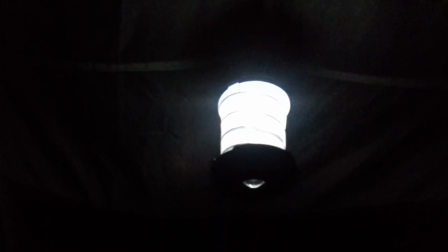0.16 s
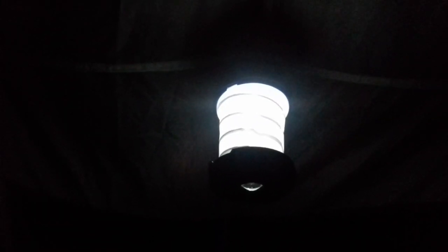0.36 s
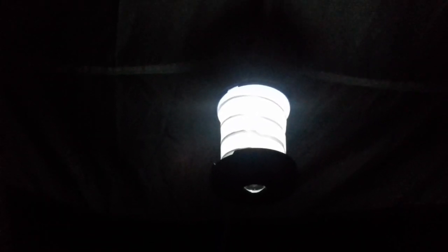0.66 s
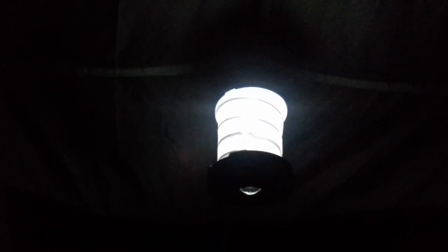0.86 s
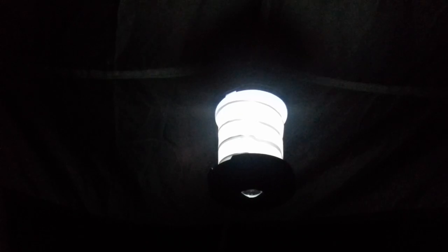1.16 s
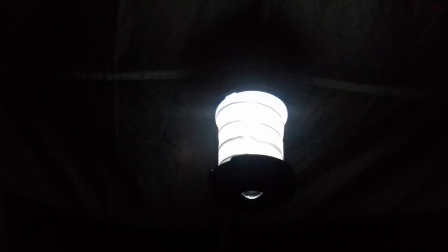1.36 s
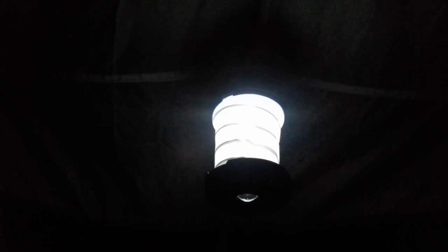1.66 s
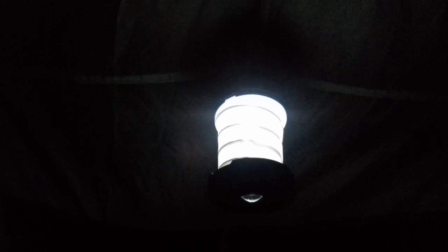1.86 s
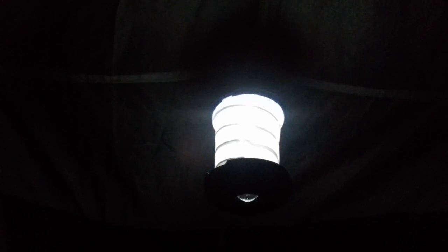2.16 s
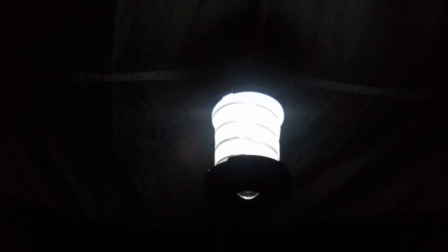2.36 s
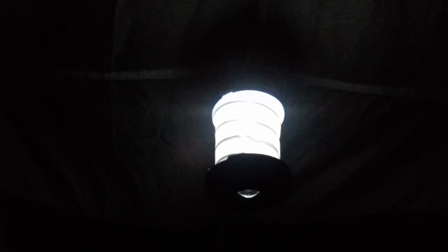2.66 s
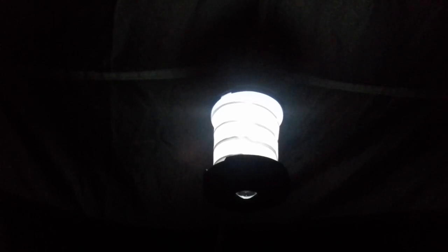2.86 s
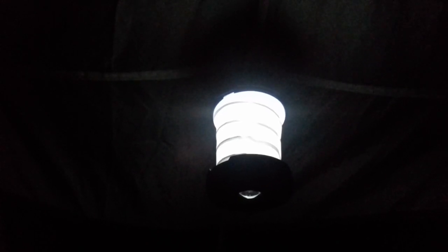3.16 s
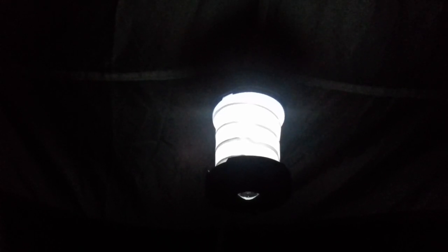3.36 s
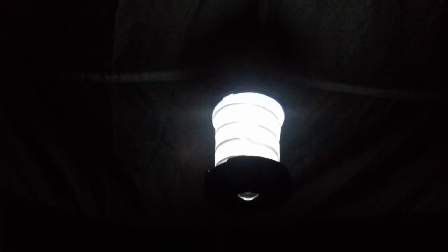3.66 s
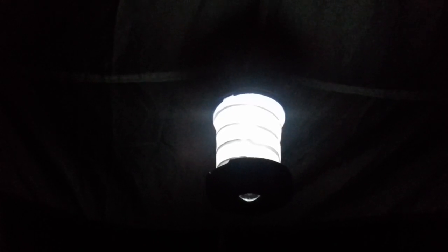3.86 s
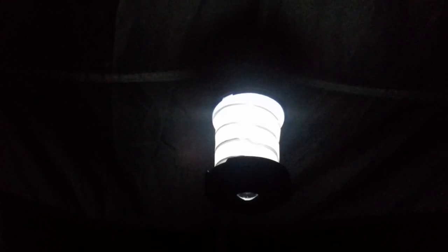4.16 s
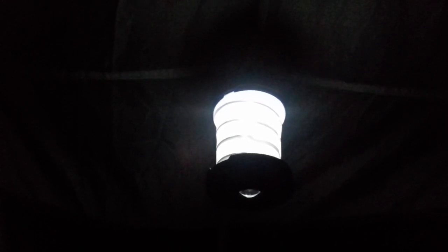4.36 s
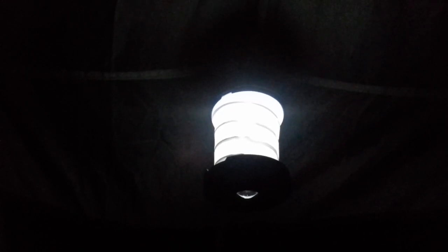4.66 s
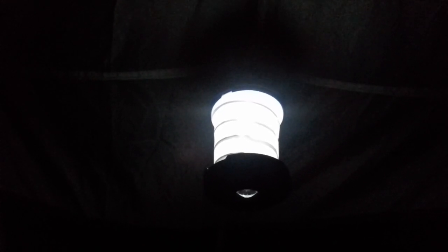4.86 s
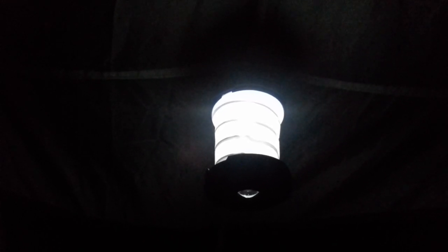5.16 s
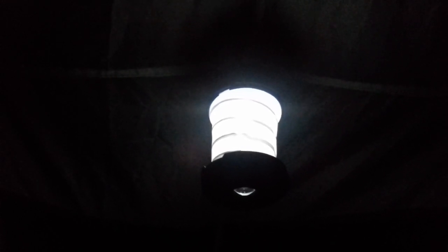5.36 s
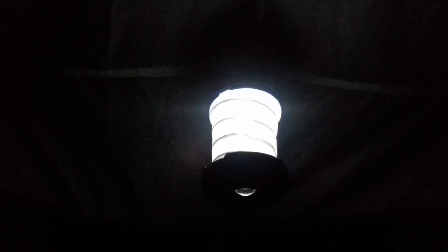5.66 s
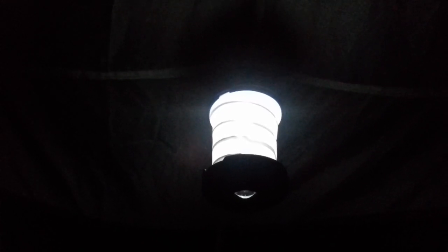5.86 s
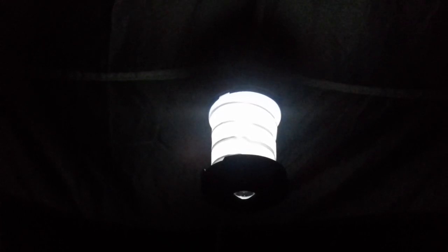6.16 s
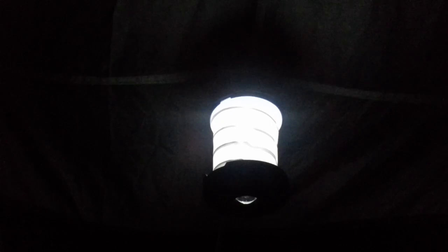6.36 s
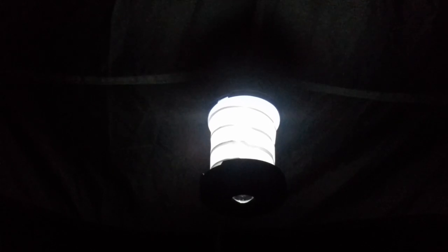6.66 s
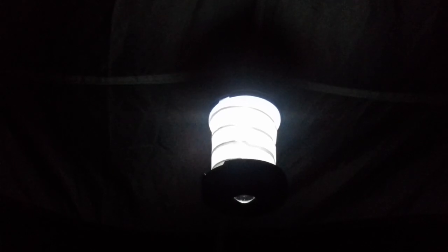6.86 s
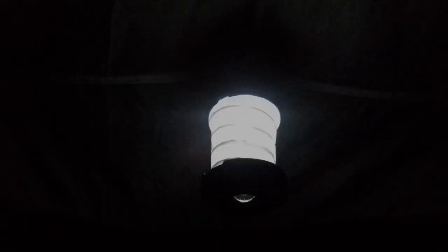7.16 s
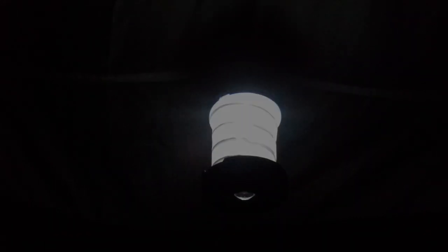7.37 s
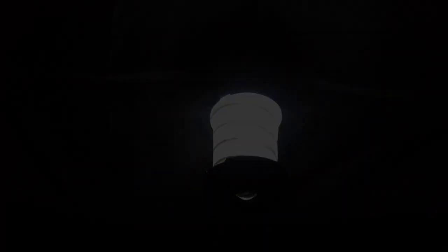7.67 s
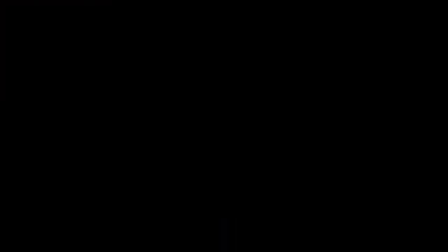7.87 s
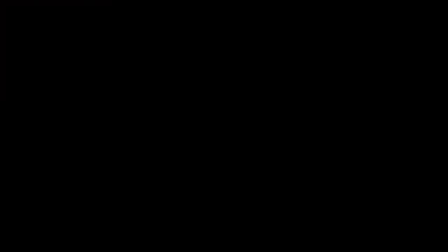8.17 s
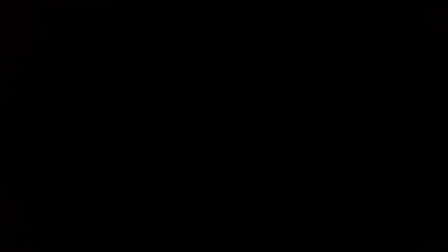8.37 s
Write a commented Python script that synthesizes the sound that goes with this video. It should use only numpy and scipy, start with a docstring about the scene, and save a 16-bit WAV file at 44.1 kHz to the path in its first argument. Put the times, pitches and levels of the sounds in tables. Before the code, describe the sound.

Inside a small tent with a lit lantern, steady rain falls on the fabric roof. Fat drops land irregularly as sharp, dry taps over a dense, finer patter, with tiny bright spray ticks and a soft low boom of the canopy. The microphone is close under the roof, with a very short weak echo and faint hiss. Near the end the sound dips for an instant, then the rain resumes.

```python
"""Steady rain on a tent, heard from inside, close under the roof, with a faint, slowly fading hiss.
From the start fat drops stand out of a dense patter: each is one sharp push on taut fabric, which
rings and flutters for a few milliseconds. Bright noise bursts make the spray, random pushes the
soft boom of the canopy, and decaying noise the short echo from ground and walls.
Near the end, at 7.9 s, the level dips at once and recovers within a fraction of a second."""
import sys
import numpy as np
from scipy import signal
from scipy.fft import rfft, irfft
from scipy.io import wavfile
from scipy.ndimage import uniform_filter1d

SR = 44100
rng = np.random.default_rng(int(sys.argv[2]) if len(sys.argv) > 2 else 0)


def dump_mix(stems):
    """Bounce the given channels to the path in sys.argv[1] as a 16-bit WAV at rate SR."""
    frames = np.atleast_2d(stems).T  # one column per channel
    limited = np.clip(frames, -1, 1)  # hard clip at full scale
    pcm = np.round(limited * 32767).astype(np.int16)
    wavfile.write(sys.argv[1], SR, pcm)


N = 375291
TIME = np.arange(N) / SR
DROP_SAMPLES = 1024
DROP_LEVEL_S = 0.01  # span over which a drop's rms level is defined


# The fattest drops overhead. Each row: start in seconds, tap level over 10 ms in dB, ring of the fabric
# at that spot in Hz, its bass roll-off in Hz, flutter against the push in dB.
FAT_DROPS = [(0.0099, -26.0, 1730, 3000, -1), (0.047, -30, 1510, 1500, 0), (0.1226, -25, 1090, 100, -9),
             (0.1487, -27, 750, 300, -4), (0.19, -27, 3160, 100, -13), (0.227, -25.5, 1720, 100, 5),
             (0.2321, -29, 540, 1500, 0), (0.2891, -23, 3460, 100, 13), (0.3068, -31.0, 1140, 100, 5),
             (0.355, -26, 1810, 100, -21), (0.3753, -29.5, 1990, 100, -5), (0.4253, -35, 1370, 3000, -2),
             (0.4337, -26, 1090, 300, -13), (0.4985, -27.5, 980, 300, 12), (0.5077, -23.0, 750, 1500, -13),
             (0.574, -31, 990, 100, 2), (0.6056, -27.5, 1040, 3000, 4), (0.615, -36, 1730, 300, -10),
             (0.6185, -18, 3080, 100, 3), (0.6223, -39, 2750, 100, 5), (0.6794, -27.5, 3360, 100, -11),
             (0.7037, -30.0, 1250, 100, -15), (0.7579, -27.5, 1900, 100, 3), (0.7861, -27, 2620, 100, 4),
             (0.8022, -32.5, 3460, 3000, -16), (0.83, -21.5, 2730, 3000, 3), (0.8541, -30, 1090, 700, -14),
             (0.8796, -28.5, 1650, 3000, 9), (0.9284, -28, 600, 3000, 5), (0.9434, -28.5, 790, 100, -9),
             (0.9876, -28.5, 520, 700, -3), (1.014, -30, 2080, 100, -5), (1.0317, -26.0, 2170, 100, 6),
             (1.079, -28, 1220, 1500, -11), (1.187, -27, 950, 300, -6), (1.2035, -30.0, 990, 3000, -7),
             (1.2142, -27, 520, 1500, -2), (1.2809, -29.5, 865, 300, -6), (1.2932, -30, 1650, 300, 6),
             (1.3549, -33, 2880, 700, 5), (1.3643, -29.5, 570, 3000, -12), (1.3946, -27.5, 2510, 100, -4),
             (1.5043, -28, 1040, 3000, -10), (1.551, -28.5, 520, 1500, 1), (1.6031, -27, 1140, 100, 0),
             (1.6285, -34, 3160, 1500, -18), (1.6712, -34, 2080, 100, -7), (1.686, -26, 2000, 3000, -10),
             (1.71, -28.5, 2390, 100, 4), (1.731, -27.5, 2740, 3000, -6), (1.784, -31.5, 1820, 100, 5),
             (1.8281, -28, 3160, 3000, 0), (1.9177, -28, 1370, 700, 0), (1.9246, -30, 1310, 300, -10),
             (1.9586, -26.5, 800, 700, 3), (1.97, -28.5, 2280, 1500, -13), (2.0468, -25, 1510, 100, -2),
             (2.0568, -23, 1810, 100, -1), (2.1177, -29, 1580, 1500, -17), (2.1228, -29, 570, 300, 1),
             (2.273, -27.5, 3020, 1500, 3), (2.291, -29.5, 860, 700, 2), (2.3008, -23, 3630, 300, -13),
             (2.328, -26.5, 3160, 100, -1), (2.3533, -29.5, 725, 300, -7), (2.416, -30, 1810, 100, -18),
             (2.4595, -21.5, 1810, 100, 2), (2.4637, -35, 520, 1500, 9), (2.4883, -28, 2870, 700, -3),
             (2.5086, -30.0, 630, 1500, -11), (2.5959, -25, 2880, 100, -13), (2.6279, -26, 1440, 3000, -5),
             (2.7178, -26.5, 3300, 300, 0), (2.725, -29, 1990, 100, -15), (2.7276, -28, 3160, 100, 9),
             (2.7564, -26.5, 1330, 300, -18), (2.8048, -29, 860, 3000, 10), (2.8642, -27.5, 2510, 100, 2),
             (2.8822, -28, 2070, 300, -14), (2.9038, -23, 520, 3000, -9), (2.9107, -24.5, 1370, 700, 0),
             (2.9264, -18.5, 2730, 300, -10), (2.985, -27.5, 790, 700, 5), (3.0029, -18, 1500, 100, 12),
             (3.0237, -24.5, 750, 1500, -10), (3.0268, -17.0, 2420, 700, -8), (3.0428, -31, 2080, 100, -13),
             (3.0573, -26.5, 1730, 100, -10), (3.097, -29.5, 520, 700, -18), (3.1805, -26.5, 2880, 700, -3),
             (3.1908, -29, 790, 700, -10), (3.2015, -23, 2180, 100, 15), (3.2217, -30, 2510, 300, 10),
             (3.2357, -29, 2280, 300, 3), (3.2436, -28, 3800, 3000, -4), (3.2736, -24.5, 3650, 3000, -15),
             (3.336, -26, 2220, 100, -11), (3.3444, -27, 790, 1500, -2), (3.4073, -24.5, 2080, 100, -13),
             (3.4296, -25.5, 800, 300, 1), (3.465, -24.0, 1810, 100, -1), (3.4972, -26.5, 520, 1500, -8),
             (3.515, -28.5, 570, 300, 0), (3.5418, -27.5, 3800, 100, 3), (3.5536, -31.5, 3630, 100, -18),
             (3.6322, -27.5, 520, 1500, 1), (3.6507, -29.5, 790, 1500, 4), (3.7796, -30, 1370, 3000, 5),
             (3.7837, -27, 1740, 1500, 3), (3.817, -35, 2620, 1500, -5), (3.8334, -24.5, 760, 1500, -4),
             (3.8871, -28.5, 1810, 3000, -3), (3.9197, -26.5, 660, 700, 12), (3.9458, -29, 755, 700, 9),
             (3.961, -26, 2900, 300, 20), (4.0278, -29.0, 1810, 300, 0), (4.053, -27, 1490, 100, 8),
             (4.1038, -25.5, 3100, 100, -17), (4.1224, -27.5, 1900, 100, -9), (4.187, -30.5, 2080, 100, -8),
             (4.2742, -23.5, 1370, 100, -2), (4.283, -29, 1050, 700, -6), (4.3035, -25.0, 2080, 300, -3),
             (4.3102, -26.5, 1040, 3000, 0), (4.3438, -28.5, 750, 700, 8), (4.3487, -31, 520, 3000, -1),
             (4.3544, -23.5, 790, 3000, 1), (4.3631, -29.5, 3160, 1500, -11),
             (4.4226, -24.5, 3020, 700, -11), (4.4669, -28.5, 3160, 300, 4), (4.549, -27.5, 3000, 100, -3),
             (4.6058, -30.5, 1810, 700, -17), (4.6302, -28, 520, 700, 17), (4.7094, -23.5, 790, 700, -8),
             (4.7609, -25, 2080, 100, 5), (4.7816, -23.5, 520, 3000, -8), (4.859, -31, 860, 3000, 3),
             (4.8766, -29.5, 790, 100, 0), (4.8796, -27.5, 520, 1500, -2), (4.8993, -29.5, 3460, 300, -16),
             (4.9612, -26, 865, 1500, -5), (4.9915, -23.5, 1900, 700, -8), (4.9992, -32, 2180, 100, 5),
             (5.0106, -28.5, 800, 3000, -6), (5.0468, -29.5, 1250, 3000, 0), (5.113, -27, 1730, 100, -1),
             (5.1183, -27, 1250, 100, -24), (5.133, -29.5, 1810, 100, 5), (5.14, -31, 2080, 3000, -6),
             (5.1775, -30, 1650, 1500, 9), (5.2425, -28.5, 1730, 700, -21), (5.307, -28, 1730, 100, 9),
             (5.4143, -28.5, 750, 100, 9), (5.4839, -26.5, 2620, 300, -16), (5.4884, -24, 2000, 100, 5),
             (5.4936, -29, 1440, 100, 10), (5.5072, -28, 1200, 1500, -7), (5.5622, -27.0, 514, 700, 13),
             (5.583, -24, 2180, 100, 4), (5.6354, -33, 1510, 3000, 5), (5.6595, -26, 1510, 100, 1),
             (5.6747, -28.5, 3440, 1500, -18), (5.6803, -31, 2080, 3000, -2),
             (5.7216, -28.5, 1370, 700, -13), (5.8335, -33, 2750, 3000, -5), (5.854, -29, 3460, 100, -8),
             (5.9396, -30.5, 990, 300, -4), (6.014, -31, 1900, 300, -4), (6.0358, -29, 3310, 1500, -6),
             (6.153, -27.5, 1250, 3000, 7), (6.1829, -24.5, 2880, 100, -1), (6.1922, -32, 2280, 100, -8),
             (6.2402, -30.0, 1810, 100, 5), (6.2564, -22, 2040, 700, -12), (6.3553, -29, 1730, 1500, -14),
             (6.361, -25.5, 3820, 100, -16), (6.431, -27.0, 690, 3000, 14), (6.4718, -24.5, 3700, 1500, -4),
             (6.4746, -29, 900, 1500, 0), (6.536, -24.5, 3800, 100, -7), (6.5456, -29, 3310, 1500, -1),
             (6.5675, -30, 2750, 100, -12), (6.5764, -28.5, 2280, 100, 1), (6.6119, -26.0, 1370, 100, -6),
             (6.6515, -27, 835, 1500, -4), (6.6584, -32, 1370, 100, -7), (6.6868, -32, 1200, 100, -2),
             (6.7269, -29.5, 750, 3000, -1), (6.7807, -27, 520, 3000, -3), (6.843, -29.5, 1900, 300, 0),
             (6.8741, -27, 1310, 100, -7), (6.9119, -25.5, 1990, 100, 12), (6.9522, -30, 1040, 3000, 8),
             (6.9602, -25.5, 2750, 300, -23), (7.031, -32, 2180, 300, -18), (7.0546, -28, 630, 700, -2),
             (7.0602, -27, 570, 700, 17), (7.0819, -27.0, 690, 700, -7), (7.1073, -26, 1990, 100, 0),
             (7.1709, -22.0, 2830, 3000, -13), (7.2608, -28, 1900, 100, -5), (7.3012, -25, 2510, 700, -19),
             (7.3075, -28, 1730, 1500, 2), (7.323, -29, 1440, 700, 1), (7.4671, -24.5, 510, 700, 0),
             (7.5067, -32, 1900, 700, -18), (7.5177, -26.5, 2280, 100, 7), (7.552, -31, 1900, 1500, -4),
             (7.6115, -31, 3310, 100, -6), (7.6231, -28.5, 2510, 100, -7), (7.6493, -24.5, 3020, 100, 3),
             (7.6564, -27.5, 2080, 100, 11), (7.7225, -26, 2880, 100, -3), (7.7361, -32, 3020, 100, -18),
             (7.7753, -31, 2390, 3000, -20), (7.799, -29, 3800, 100, 1), (7.8043, -26.5, 1090, 3000, 1),
             (7.8413, -33, 3310, 300, -8), (7.9183, -28, 1310, 1500, 9), (7.9326, -25.0, 560, 300, -1),
             (8.0401, -24.5, 3240, 300, -27), (8.1088, -31.0, 2750, 100, -18),
             (8.1621, -30, 1810, 300, -11), (8.2522, -24.0, 1740, 100, 2), (8.3129, -29.5, 690, 100, -9),
             (8.3946, -29.5, 3820, 700, 1), (8.4008, -28.5, 1260, 100, -16), (8.4567, -28.5, 2040, 700, 5)]


def fat_drops():
    """Heavy drops right overhead: each taps its own spot of the cloth and swings a panel."""
    times, db, ring_hz, bass_hz, flutter_db = np.transpose(FAT_DROPS)
    taps = strikes(times, db, ring_hz, bass_hz, flutter_db, ring_db=4.0, ring_q=3.2,
                   flutter_s=0.0046, smear_s=0.0003, seam_gain=0.21)
    return taps + thump(times, db, panel_hz=678, spread=0.44, decay_s=0.0031)


THUMP_REF_DB = -20  # tap level at which THUMP_DB holds
THUMP_DB, THUMP_GROWTH = -20, 1.1  # thump against tap in dB; dB of thump per dB of tap


def thump(times, db, panel_hz, spread, decay_s):
    """A heavy drop swings a whole panel as a decaying sine, the heaviest more than the rest."""
    age = np.arange(DROP_SAMPLES) / SR
    hz = panel_hz * np.exp(spread * (2 * rng.random((len(times), 1)) - 1))
    swing = np.sin(2 * np.pi * hz * age) * np.exp(-age / decay_s)
    panel_speed = np.diff(swing, prepend=0)  # the air follows the panel's speed
    thump_db = THUMP_REF_DB + THUMP_DB + THUMP_GROWTH * (db - THUMP_REF_DB)
    return place(panel_speed, times, thump_db)


# A drop's push as the wet fabric radiates it, dull above 4 kHz. Each row: frequency in Hz, gain in dB.
FABRIC_RADIATION = [(25, -52), (100, -32), (250, -12), (450, -9), (700, -5.5), (1100, -4), (1700, -2.5),
                    (2300, -1), (3000, -3), (3600, -4.5), (4300, -17), (5400, -36), (8000, -46),
                    (15000, -93)]


def strikes(times, db, ring_hz, bass_hz, flutter_db, ring_db, ring_q, flutter_s,
            smear_s=0.00043, seam_gain=0.33):
    """Each drop is a push, a short ring of the spot that it hits, and a dying flutter of the cloth."""
    age = np.arange(DROP_SAMPLES) / SR
    hz = np.fft.rfftfreq(DROP_SAMPLES, 1 / SR)
    slack, wetness, seam = rng.random((len(times), 3)).T[:, :, None]

    # slack spots flap longer than taut ones
    flap_s = flutter_s * 2 ** (slack - 0.5)
    noise = rng.standard_normal((len(times), DROP_SAMPLES))
    flutter = noise * np.exp(-age / flap_s) * np.sqrt(2 / (flap_s * SR))
    push = (age == 0) + undb(flutter_db)[:, None] * flutter

    ratio = 1j * hz / ring_hz[:, None]
    resonance = ratio / ring_q / (1 + ratio / ring_q + ratio ** 2)
    ring = 1 + undb(ring_db) * resonance
    # a small taut spot gives little bass
    bass_cut = 1j * hz / (1j * hz + bass_hz[:, None])
    # water on the cloth delays the treble and smears the click
    smear = np.exp(-1j * np.pi * hz * smear_s * (0.21 + 0.85 * wetness) * hz / 3000)
    # the wave comes back inverted from the nearest seam and colours each tap differently
    seam_delay_s = 0.00027 + 0.001443 * seam
    rebound = 1 - seam_gain * np.exp(-2j * np.pi * hz * seam_delay_s)

    fabric = rfft(colour(np.ones(1), FABRIC_RADIATION)[:DROP_SAMPLES])
    waves = irfft(rfft(push) * ring * bass_cut * smear * rebound * fabric)
    return -place(waves, times, db)


# Strength of the patter over time. Each row: time in seconds, gain in dB.
SHOWER_GAIN = [(0, -30.5), (1.5, -30), (2.8, -32), (4, -30.5), (5.4, -31), (6.8, -30), (7.9, -30),
               (8.05, -32), (8.3, -33.5), (8.5, -30)]


def shower():
    """Three layers of patter: single taps nearby, the roof, fine rain on the farther panels."""
    taps = patter(count=380, size=1, bunch_s=0.02, scatter_db=8.5, ring_hz=1840, ring_spread=0.94,
                  ring_db=3.0, flutter_db=-2.5, flutter_s=0.0031)
    roof = patter(count=360, size=3, bunch_s=0.005, scatter_db=7.0, ring_hz=1554, ring_spread=0.89,
                  ring_db=3.5, flutter_db=-5.5, flutter_s=0.0062)
    fine = patter(count=850, size=3, bunch_s=0.007, scatter_db=6.5, ring_hz=1740, ring_spread=1.19,
                  ring_db=-1.0, flutter_db=-1.5, flutter_s=0.0063)
    mix = undb(-7.5) * taps + undb(-6.0) * roof + undb(-5.5) * fine
    return undb(curve(SHOWER_GAIN)) * mix


def patter(count, size, bunch_s, scatter_db, ring_hz, ring_spread, ring_db, flutter_db, flutter_s,
           bass_hz=330, bass_spread=1.45, flutter_spread_db=5.5):
    """Bunches of drops at random moments on random spots, each with its own ring, bass and flutter."""
    lag, weight, spot, span, slack = rng.random((count * size, 5)).T
    # one bunch starts somewhere in each slot of time, so the rain never stops
    starts = (np.arange(count) + rng.random(count)) * N / SR / count
    times = np.repeat(starts, size) + bunch_s * (2 * lag - 1)
    db = -scatter_db * np.sqrt(weight)
    # the Hz spreads are natural-log half-widths
    spot_hz = ring_hz * np.exp(ring_spread * (2 * spot - 1))
    spot_bass_hz = bass_hz * np.exp(bass_spread * (2 * span - 1))
    spot_flutter_db = flutter_db + flutter_spread_db * (2 * slack - 1)
    hits = strikes(times, db, spot_hz, spot_bass_hz, spot_flutter_db, ring_db,
                   ring_q=2.6, flutter_s=flutter_s)
    return level(hits, 0)


# Drops that burst with a bright spray. Each row: start in seconds, average droplet peak in dB.
BIG_BURSTS = [(0.011, -52), (0.289, -52), (0.355, -53), (0.374, -53), (0.433, -48), (0.477, -52),
              (0.502, -51), (0.617, -50), (0.697, -51), (0.786, -51), (0.831, -51), (0.879, -47),
              (1.186, -45), (1.737, -49), (2.297, -54), (2.584, -52), (2.726, -47), (2.804, -50),
              (3.002, -43), (3.023, -53), (3.041, -54), (3.612, -42), (4.053, -50), (4.140, -52),
              (4.272, -46), (4.297, -48), (4.346, -49), (4.387, -48), (4.421, -48), (4.443, -51),
              (4.545, -50), (5.112, -51), (7.163, -52), (7.630, -49), (7.649, -47), (8.106, -50),
              (8.251, -48)]
# Colour of the spray. Each row: frequency in Hz, relative gain in dB.
SPRAY_COLOUR = [(500, -36), (3000, 18.5), (5000, 12.5), (7200, 7), (9000, 0.5), (15000, -24)]


def splashes(count, spray_s, small_db, scatter_db, flight_s, size=4):
    """Bursting drops throw droplets, each a decaying puff of bright noise; small bursts tick between."""
    moment, weight = rng.random((count, 2)).T
    small = np.column_stack([moment * N / SR, small_db - scatter_db * np.sqrt(weight)])
    starts, db = np.vstack([BIG_BURSTS, small]).T
    flight, mass = rng.random((len(starts), 2, size)).transpose(1, 0, 2)
    mass = (1 + mass) / (1 + np.arange(size))  # later droplets tend to be smaller
    lands = starts[:, None] + flight_s * flight * np.arange(size) / size
    share = size * mass / mass.sum(1, keepdims=True)
    energy = undb(db)[:, None] ** 2 * share
    bursts = np.bincount((lands * SR).astype(int).ravel(), energy.ravel(), N)[:N]
    power = signal.lfilter([1], [1, -np.exp(-2 / (spray_s * SR))], bursts)
    return np.sqrt(power) * level(colour(rng.standard_normal(N), SPRAY_COLOUR), 0)


# Soft boom of the whole canopy. Each row: frequency in Hz, relative gain in dB.
CANOPY_BOOM = [(20, -4), (38, -16), (54, 2), (80, -2.5), (115, 6.5), (160, 4.5), (220, 7.5), (350, 9.5),
               (600, -0.5), (1500, -32), (5000, -64)]


def canopy(count):
    """Many small random pushes keep the large panels booming softly."""
    moment, size = rng.random((count, 2)).T
    pushes = np.bincount((moment * N).astype(int), 2 * size - 1, N)
    return level(colour(pushes, CANOPY_BOOM), -53.0)


def tent(x, echo_db, t60_s, count=10):
    """Ground and thin walls give a short, weak echo; its path is drawn anew every 10 ms."""
    age = np.arange(SR // 8) / SR
    slot = int(DROP_LEVEL_S * SR)
    part = np.repeat(rng.integers(0, count, N // slot + 1), slot)[:N]
    noise = rng.standard_normal((count, len(age)))
    echoes = noise * np.exp(-np.log(1000) * age / t60_s) * (age > 0.004)
    echoes /= np.linalg.norm(echoes, axis=1, keepdims=True)
    # smoothed twice, so that paths crossfade
    shares = 1.0 * (part == np.arange(count)[:, None])
    shares = uniform_filter1d(uniform_filter1d(shares, slot // 4), slot // 4)
    echo = signal.oaconvolve(x * shares, echoes, axes=1).sum(0)[:N]
    return x + undb(echo_db) * echo


DIP_AT_S = 7.942


def dip(depth_db, recovery_s):
    """Gain that drops at once by depth_db; the dip in dB then decays exponentially."""
    since = np.maximum(TIME - DIP_AT_S, 0)
    return undb(-depth_db * (since > 0) * np.exp(-since / recovery_s))


def undb(db):
    """Decibels to gain."""
    return 10 ** (np.asarray(db) / 20)


def level(x, db):
    """Scale to an rms level."""
    return x * undb(db) / np.sqrt(np.mean(x ** 2))


def curve(rows):
    """Join (s, value) rows by straight lines."""
    return np.interp(TIME, *np.transpose(rows))


def colour(x, points):
    """Minimum-phase filter through (Hz, dB) points, so that hits keep their sharp front."""
    hz, db = np.transpose(points)
    grid = np.maximum(np.fft.rfftfreq(4096, 1 / SR), 1)
    gain = undb(np.interp(np.log(grid), np.log(hz), db))
    # fold the cepstrum to make it causal
    cepstrum = irfft(np.log(gain))
    half = len(cepstrum) // 2
    cepstrum[1:half] *= 2
    cepstrum[half + 1:] = 0
    return signal.fftconvolve(x, irfft(np.exp(rfft(cepstrum))))[:N]


def place(waves, times, db):
    """Lay short sounds at their times, each at its own rms level over DROP_LEVEL_S."""
    gain = undb(db) * np.sqrt(DROP_LEVEL_S * SR) / np.linalg.norm(waves, axis=1)
    places = (np.maximum(times, 0) * SR).astype(int)[:, None] + np.arange(DROP_SAMPLES)
    return np.bincount(places.ravel(), (waves * gain[:, None]).ravel(), N)[:N]


def scene():
    """Fat drops, patter, boom and spray under one roof, the same in both channels."""
    spray = splashes(count=240, spray_s=0.0033, small_db=-48.5, scatter_db=10.5, flight_s=0.016)
    rain = fat_drops() + shower() + canopy(count=9000) + spray
    return np.tile(tent(rain, echo_db=-13.5, t60_s=0.2), (2, 1))


# Hiss and low rumble of the microphone, with a narrow hollow in the treble.
# Each row: frequency in Hz, relative gain in dB.
HISS_COLOUR = [(25, 8), (40, -5), (54, 2), (75, 7.5), (200, 11.5), (500, 11), (1200, 6), (2200, -9),
               (4000, 3.5), (5700, 1.5), (10400, -1), (11000, -14), (11700, -0.5), (15500, -1.5)]
HISS_START_DB, HISS_FADE_DB_PER_S = -52, 0.24
RAIN_DIP_DB, RAIN_RECOVERY_S = 24, 0.032
HISS_DIP_DB, HISS_RECOVERY_S = 11, 0.086  # the hiss dips less, and for longer
TOP_HZ = 15900


def record(dry):
    """Each channel adds its own slowly fading hiss, the level dips once, and the top is cut."""
    hiss = np.array([level(colour(rng.standard_normal(N), HISS_COLOUR), HISS_START_DB) for _ in range(2)])
    hiss = hiss * undb(-HISS_FADE_DB_PER_S * TIME) * dip(HISS_DIP_DB, HISS_RECOVERY_S)
    sound = dry * dip(RAIN_DIP_DB, RAIN_RECOVERY_S) + hiss
    top_cut = signal.ellip(10, 0.2, 70, TOP_HZ, fs=SR, output="sos")
    return signal.sosfilt(top_cut, sound)


dry = scene()
out = record(dry)
dump_mix(out)
```